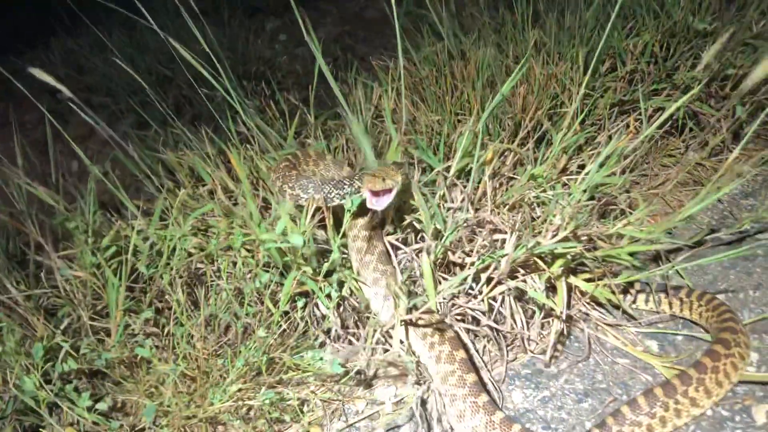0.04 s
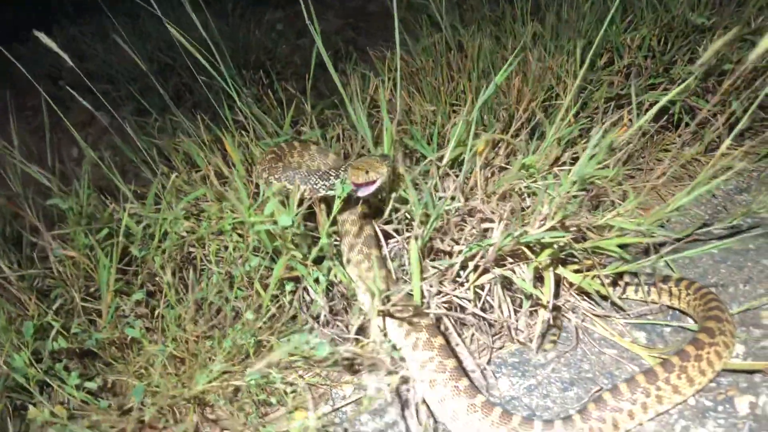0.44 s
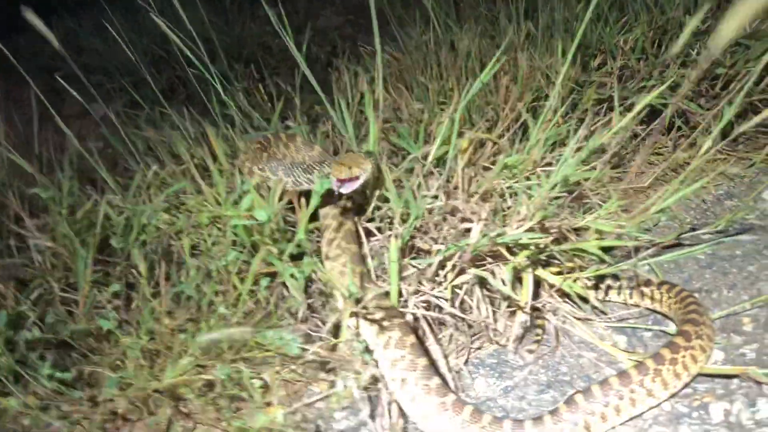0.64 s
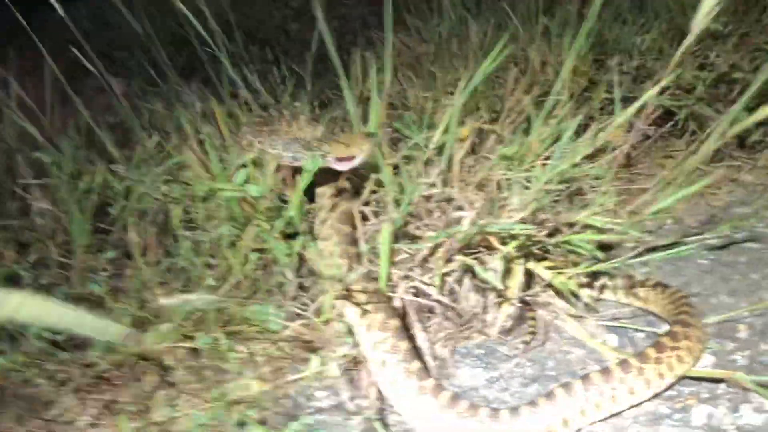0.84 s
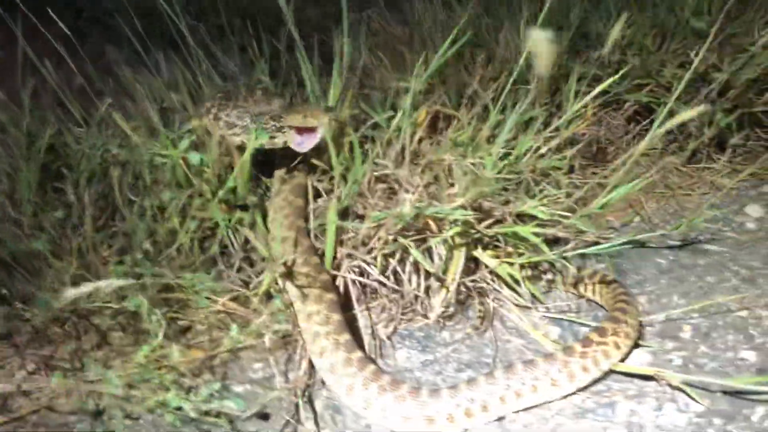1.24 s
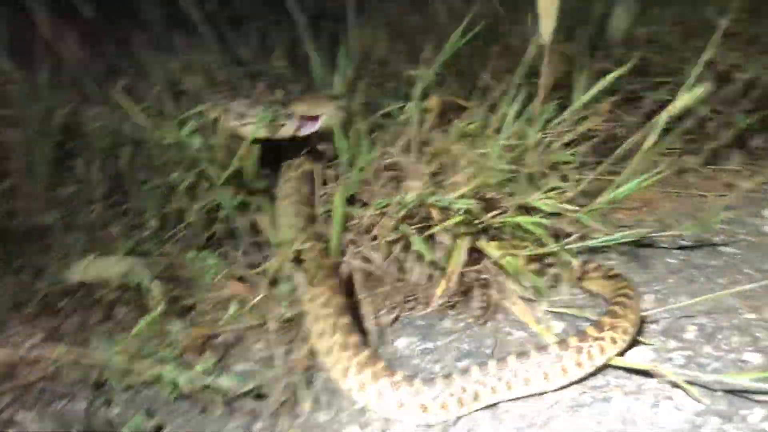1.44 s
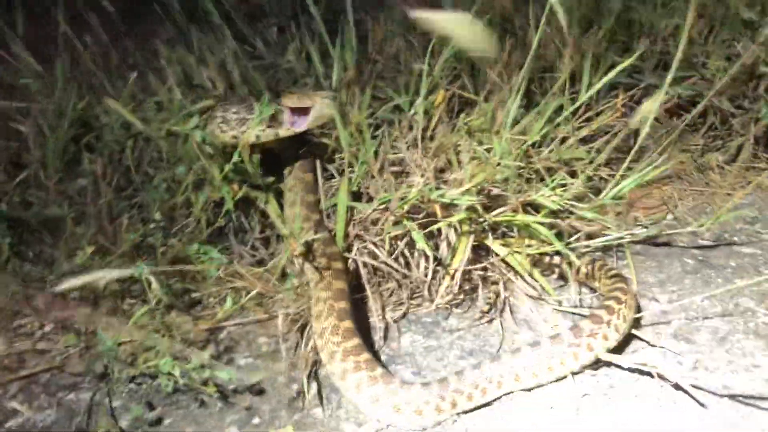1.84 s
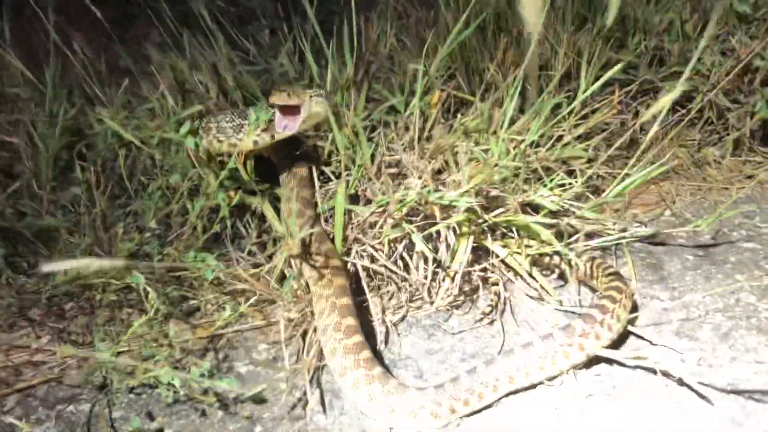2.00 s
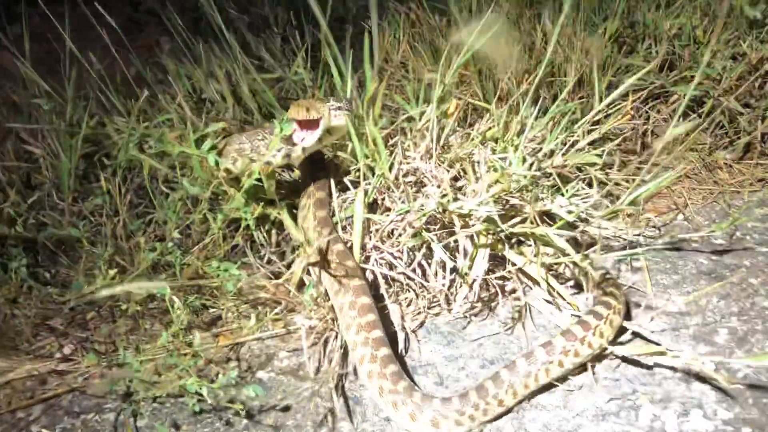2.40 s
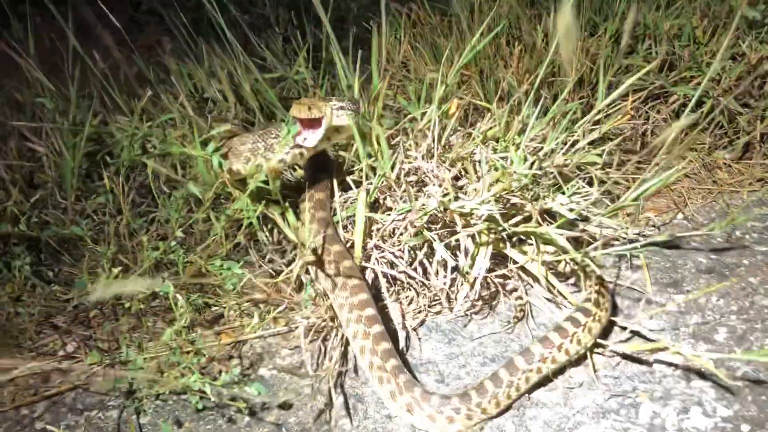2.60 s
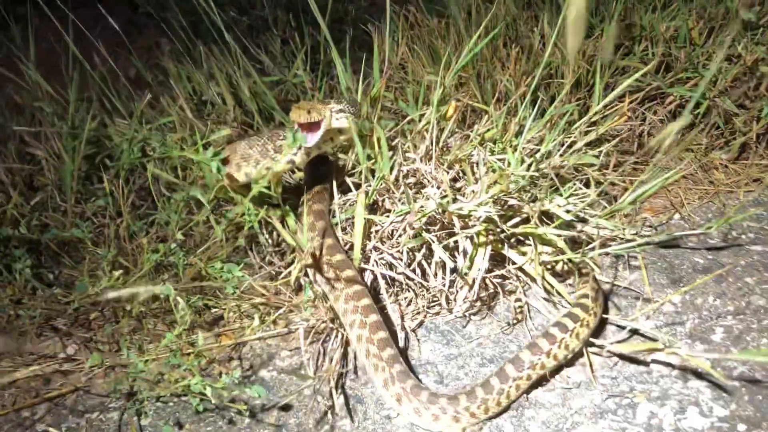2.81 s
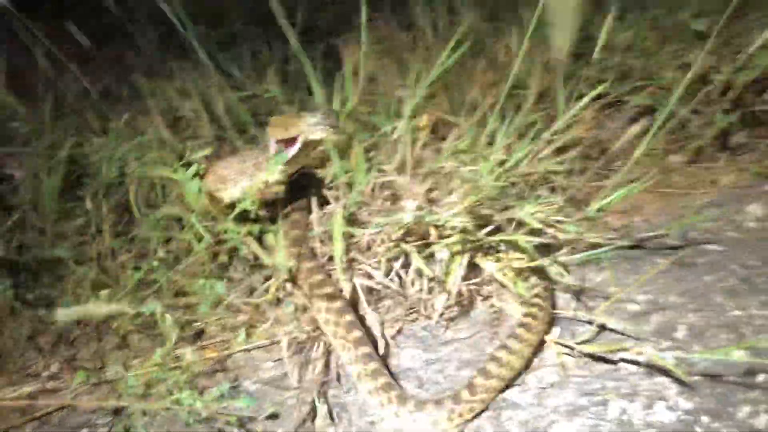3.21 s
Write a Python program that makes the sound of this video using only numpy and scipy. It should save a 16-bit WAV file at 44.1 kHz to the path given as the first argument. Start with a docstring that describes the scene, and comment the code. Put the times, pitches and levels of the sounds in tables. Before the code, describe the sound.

A snake hisses outdoors: first a soft breath in, then after a brief pause a loud, breathy breath out that grows nearly whistling. Uneven gusts of wind rumble on the microphone throughout, over a faint night hush.

```python
"""At night, wind rumbles and buffets on one microphone, over a faint outdoor hush.
A coiled snake in the grass draws in air with a thin hiss that fades away after a second.
It pauses, then forces out a long, loud hiss that rings in its throat and open mouth.
That hiss sharpens to a near whistle as it goes on, and its highest part flares briefly.
Near the end the wind gives one deep shove."""
import sys
import numpy as np
from scipy import signal
from scipy.fft import rfft, irfft, next_fast_len
from scipy.io import wavfile
from scipy.ndimage import uniform_filter1d, minimum_filter1d, map_coordinates

SR = 44100
rng = np.random.default_rng(int(sys.argv[2]) if len(sys.argv) > 2 else 0)


def log_audio(samples):
    """Write samples as a 16-bit WAV file to the path given in sys.argv[1]."""
    # one column per channel
    frames = np.atleast_2d(samples).T
    # limit to full scale, then quantise
    limited = np.clip(frames, -1, 1)
    pcm = np.round(limited * 32767).astype(np.int16)
    wavfile.write(sys.argv[1], SR, pcm)


N = 147735


def amp(db):
    """Turn decibels into a number to multiply a sound by."""
    return 10 ** (np.asarray(db) / 20)


def curves(rows):
    """Join rows of (time, values...) with straight lines: one curve for each value column."""
    times, *columns = np.transpose(rows)
    return [np.interp(np.arange(N) / SR, times, column) for column in columns]


def wobble(per_s):
    """A smooth random curve through per_s random points a second."""
    return map_coordinates(rng.standard_normal(N // 20), [np.arange(N) * per_s / SR], mode="wrap")


def noise(gain):
    """Noise of average strength (rms) 1; gain(hz) says how much of each frequency it holds."""
    size = next_fast_len(N + 8192)
    spectrum = rfft(rng.standard_normal(size)) * gain(np.fft.rfftfreq(size, 1 / SR))
    shaped = irfft(spectrum, size)[:N]
    return shaped / np.sqrt(np.mean(shaped ** 2) + 1e-20)


def colour(points):
    """A balance of low and high sound: a gain through (f/Hz, level/dB) points."""
    freqs, db = np.transpose(points)
    return lambda hz: amp(np.interp(np.log(hz + 1), np.log(freqs), db))


def cavity(resonances, rush_db):
    """The gain of a hollow space: a peak wherever it rings, over an even rush of air."""
    def gain(hz):
        peaks = sum(amp(db) ** 2 / (1 + ((hz - centre) / width) ** 2) ** 4
                    for centre, width, db in resonances)
        return np.sqrt(amp(rush_db) ** 2 + peaks)
    return gain


def treble_gain(sound, above_hz, db):
    """Change the level of the treble, the part of a sound above a given frequency."""
    body = signal.sosfiltfilt(signal.butter(4, above_hz, fs=SR, output="sos"), sound)
    return body + amp(db) * (sound - body)


def night_hush(level_db=-43.5):
    """The faint, steady sound of the night air."""
    # colour of the night air: f/Hz, level/dB
    hush_colour = [(25, -12), (60, 9.5), (150, -12.5), (330, -7.5), (550, -15), (1000, -18.5),
                   (1500, -25.5), (1900, -22.5), (2250, -28), (3100, -25), (4500, -33.5), (8000, -33.5),
                   (15000, -38)]
    return amp(level_db) * noise(colour(hush_colour))


def wind_rumble(lumps_db=2.0):
    """Wind presses on the microphone in slow, uneven lumps."""
    # strength of the wind: t/s, level/dB
    strength = [(0, -28), (.19, -28.5), (.26, -25.5), (.41, -26.5), (.47, -34), (.57, -24.5), (.62, -41),
                (.68, -19), (.78, -30), (.85, -21), (1.02, -20), (1.19, -26), (1.42, -20.5), (1.49, -15),
                (1.77, -20), (2.08, -19.5), (2.29, -22.5), (2.33, -30.5), (2.41, -48.5), (2.49, -23.5),
                (2.59, -23.5), (2.65, -42), (2.72, -21.5), (2.8, -24), (2.87, -27.5), (2.9, -19),
                (3.09, -32.5), (3.16, -39), (3.2, -40), (3.25, -55), (3.35, -45)]
    # colour of the rumble: f/Hz, level/dB
    rumble_colour = [(20, -50), (35, -17), (62, -4.5), (100, -4), (170, -6.5), (280, -16), (450, -28),
                     (800, -46), (1600, -71)]
    level_db, = curves(strength)
    return amp(level_db + lumps_db * wobble(per_s=35)) * noise(colour(rumble_colour))


def inward_hiss(dulling_db_per_db=0.54):
    """Air drawn in through the throat fades and dulls as the lung fills."""
    # loudness of the breath in: t/s, level/dB
    loudness = [(0, -44.5), (.15, -46), (.35, -47), (.6, -49), (.82, -52), (.93, -58), (1.02, -80)]
    # where throat and mouth ring: f/Hz, width/Hz, level/dB
    throat_resonances = [(1910, 440, -8.5), (3910, 450, 0.5), (5200, 580, -5), (5790, 390, -1),
                         (7000, 350, -8.5), (7560, 270, -11), (8800, 600, -21), (11250, 750, -10),
                         (12400, 530, -6.5), (13100, 500, -14), (14300, 500, -7), (15200, 800, -11)]
    level_db, = curves(loudness)
    hiss = noise(cavity(throat_resonances, rush_db=-18.5))
    treble_db = dulling_db_per_db * (level_db - level_db.max())
    return amp(level_db) * treble_gain(hiss, above_hz=6500, db=treble_db)


def wind_buffets(attack_s=0.005, release_s=0.008, front_db=1.5, front_s=0.008, flutter_db=2.5):
    """Swirls of air sweep over the microphone: a harder push makes them faster and brighter."""
    # single pushes of wind: t/s, length/s, level/dB, brightness/octaves
    buffets = [(0.019, 0.021, -32, .1), (0.058, .04, -33, 0.26), (0.109, 0.068, -33, 0.2),
               (0.241, 0.049, -24, 0.088), (0.327, 0.044, -27, -0.22), (0.37, 0.034, -17, 0.092),
               (.565, 0.021, -24, 0.11), (.68, .022, -24, -0.37), (.765, 0.024, -28.5, 0.051),
               (0.823, 0.031, -29, -0.46), (0.865, 0.011, -18.5, -0.073), (.894, 0.0094, -21, 0.083),
               (0.915, .043, -24, -0.11), (0.996, 0.017, -15, -0.14), (1.034, 0.047, -20.5, 0.013),
               (1.1, 0.026, -20.5, -0.052), (1.134, 0.063, -29, -.1), (1.223, 0.021, -20, -.3),
               (1.263, 0.0081, -20, 0.36), (1.28, 0.012, -18.5, 0.19), (1.307, 0.031, -25, -0.12),
               (1.388, 0.0071, -18, 0), (1.455, 0.0082, -11.5, 0.27), (1.473, 0.014, -12, .2),
               (1.496, .023, -16, -0.12), (1.528, 0.01535, -10, -0.36), (1.552, 0.028, -18, -0.063),
               (1.59, .018, -12, 0.34), (1.615, 0.027, -19.5, -0.12), (1.686, 0.049, -15, 0.14),
               (1.748, .032, -22.5, 0), (1.8, 0.028, -16.5, 0.04), (1.838, .01, -10.5, 0.37),
               (1.872, .014, -12, 0.14), (1.904, .018, -14, 0.093), (1.95, .026, -8, .15),
               (1.984, .008, -20, .3), (1.997, 0.0201, -17, -1.5), (2.035, 0.031, -14.5, -.1),
               (2.073, 0.0226, -13, -0.28), (2.099, 0.086, -19.5, -.2), (2.208, 0.0081, -15, 0.22),
               (2.24, 0.028, -17, -.1), (2.285, 0.015, -19.5, -1.18), (2.51, 0.074, -26.5, 0.054),
               (2.709, 0.0084, -20, 0.26), (2.73, .04, -29, -.1), (2.885, 0.011, -21.5, -0.25),
               (2.912, .12, -30.5, -0.091)]
    # colour of the swirls at speed 1: f/Hz, level/dB
    swirl_colour = [(25, -48), (80, -13.5), (140, 0.5), (220, 4.5), (380, 1), (600, -6), (900, -15.5),
                    (1300, -29), (1900, -47), (3000, -78), (5000, -110)]
    reference_db, octaves_per_db, scatter_octaves = -18, 0.0308, 0.19
    t = np.arange(N) / SR
    pushes = []
    for start, length, db, _ in buffets:
        front = np.exp(-np.abs(t - start) / front_s)  # the leading edge hits hardest
        rise = np.clip((t - start) / attack_s + 0.5, 0, 1)
        fall = np.exp(-np.maximum(t - start - length, 0) / release_s)
        pushes.append(amp(db + front_db * front) * rise * fall)
    push = np.max(pushes, axis=0) * amp(flutter_db * wobble(per_s=230))
    push_db = 20 * np.log10(push + 1e-3)
    *_, brightness = np.transpose(buffets)
    strongest = np.argmax(pushes, axis=0)
    octaves = brightness[strongest] + octaves_per_db * (push_db - reference_db)
    octaves += scatter_octaves * wobble(per_s=260)  # small and large swirls follow each other
    speed = 2 ** octaves
    swirls = noise(colour(swirl_colour))
    # Running through the noise faster makes it sound higher.
    return push * map_coordinates(swirls, [np.cumsum(speed)], mode="wrap")


def outward_hiss(rush_db=-17.5, waver_db=0.75, rough_db=1.07):
    """Air is forced through the windpipe's opening; the mouth changes shape and a whistle grows."""
    # the breath out: t/s, level/dB, mouth shift (0 = first shape, 1 = last shape)
    breath = [(1.08, -59, 0.3), (1.15, -46, 0.06), (1.22, -41, 0), (1.35, -39.5, 0.16), (1.85, -38, 0.3),
              (2.03, -36.5, 0.43), (2.3, -37.5, .75), (2.48, -37.3, 0.71), (2.7, -34.5, 0.88),
              (3.05, -35.5, 1), (3.35, -36, 0.86)]
    # where the mouth rings in its first shape: f/Hz, width/Hz, level/dB
    first_resonances = [(1770, 140, -5.5), (2720, 510, -7.5), (3660, 490, -1.5), (4070, 240, 1),
                        (4520, 450, -3), (5690, 350, -2.5), (6490, 860, -1), (8400, 621, -5.5),
                        (9220, 1120, -2), (11200, 1100, -3.5), (12250, 600, -3.5), (13300, 1200, -5.5),
                        (15000, 1700, -13)]
    # where it rings in its last shape: f/Hz, width/Hz, level/dB
    last_resonances = [(1660.8, 553, -14), (2744.5, 284, -6.5), (3738, 312, -0.5), (4041.4, 364, -2),
                       (4965, 290, -2.5), (5900, 360, 5), (6590, 670, 0), (7640, 370, 2),
                       (8400, 1236, -0.5), (10420, 726, -0.5), (11480, 450, 3), (12460, 460, 3.5),
                       (13200, 800, 1), (15500, 2100, -5)]
    start_s, bright_s, dull_db = breath[0][0], 1.37, -6
    level_db, shift = curves(breath)
    first_hiss = noise(cavity(first_resonances, rush_db))
    last_hiss = noise(cavity(last_resonances, rush_db))
    hiss = np.sqrt(1 - shift) * first_hiss + np.sqrt(shift) * last_hiss
    # At first the treble lags behind the swelling hiss.
    treble_db = np.interp(np.arange(N) / SR, [start_s, bright_s], [dull_db, 0])
    hiss = treble_gain(hiss, above_hz=7009, db=treble_db)
    tone = whistle(shift)
    flow = amp(level_db + waver_db * wobble(per_s=12) + rough_db * wobble(per_s=250))
    return flow * (hiss + tone)


def whistle(mouth_shift, pitch_hz=5692, width_hz=189.4, relative_db=-5):
    """Air passing the edge of the windpipe's opening nearly whistles, louder as the mouth shifts."""
    narrow_band = noise(lambda hz: 1 / np.sqrt(1 + (2 * (hz - pitch_hz) / width_hz) ** 4))
    return amp(relative_db) * mouth_shift ** 1.305 * narrow_band


def hiss_flare(peak_s=2.039, width_s=0.099, level_db=-45):
    """The very highest part of the hiss swells briefly."""
    # the band that swells: f/Hz, width/Hz, level/dB
    high_band = [(15023, 1084, 0)]
    swell = np.exp(-((np.arange(N) / SR - peak_s) / width_s) ** 2)
    return amp(level_db) * swell * noise(cavity(high_band, rush_db=-33))


def wind_thud(start_s=2.885, rise_s=0.01, level_db=-15, fall_db_per_s=63):
    """One deep shove of air, heard only in the bass."""
    # colour of the shove: f/Hz, level/dB
    thud_colour = [(25, -35), (45, -4), (64, 4), (95, -5), (140, -13.5), (220, -34), (500, -60)]
    age = np.maximum(np.arange(N) / SR - start_s, 0)
    rise = 1 - np.exp(-age / rise_s)
    return amp(level_db - fall_db_per_s * age) * rise * noise(colour(thud_colour))


def scene():
    """Snake, wind and night air add up at one microphone."""
    snake = inward_hiss() + outward_hiss() + hiss_flare()
    wind = wind_rumble() + wind_buffets() + wind_thud()
    return (snake + wind + night_hush())[None]


def record(dry):
    """A fast limiter turns down the hardest buffets, then the very highest sound is cut off."""
    ceiling, top_hz = 0.84, 15740
    needed_gain = np.minimum(1, ceiling / (np.abs(dry) + 1e-9))
    held_gain = minimum_filter1d(needed_gain, size=128)
    smooth_gain = uniform_filter1d(uniform_filter1d(held_gain, size=64), size=64)
    size = next_fast_len(N + SR // 2)
    below_top = np.fft.rfftfreq(size, 1 / SR) < top_hz
    return irfft(rfft(dry * smooth_gain, size) * below_top, size)[:, :N]


dry = scene()
out = record(dry)
log_audio(out)
```